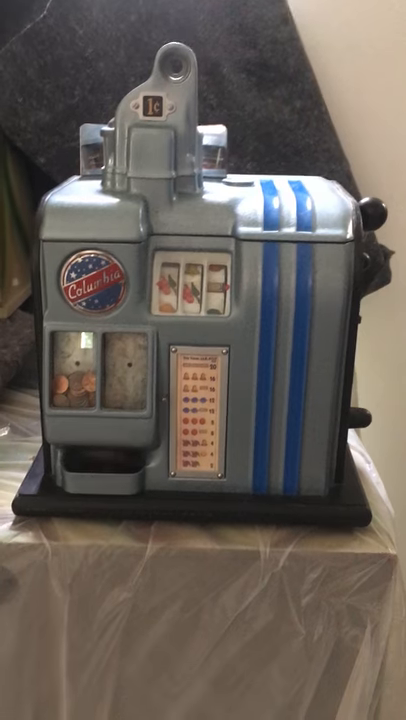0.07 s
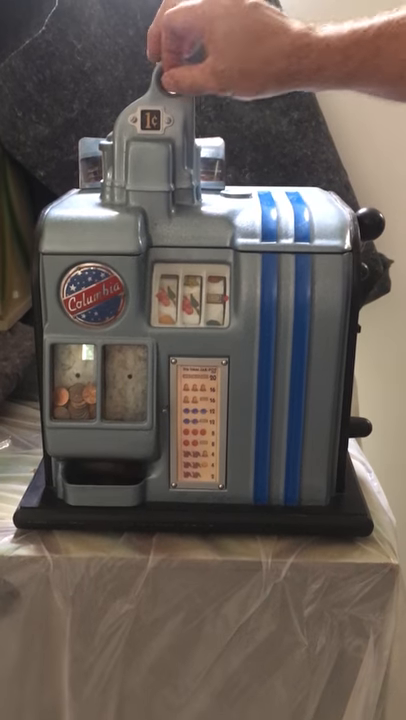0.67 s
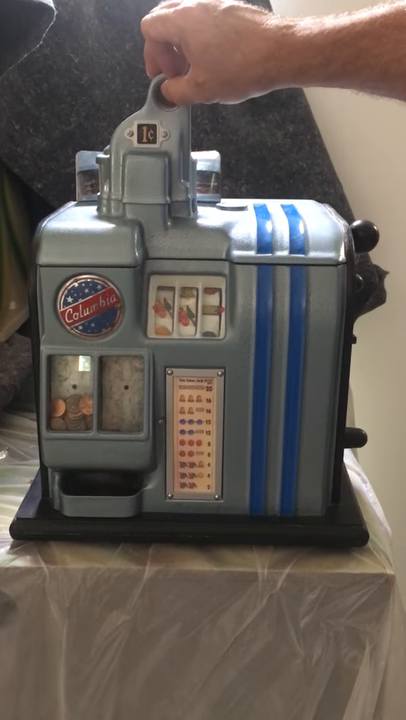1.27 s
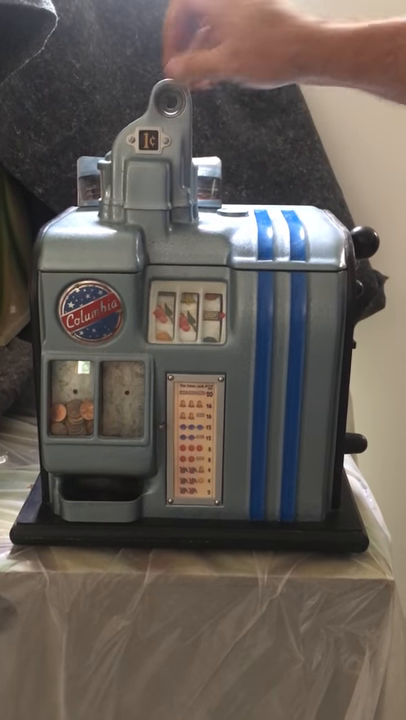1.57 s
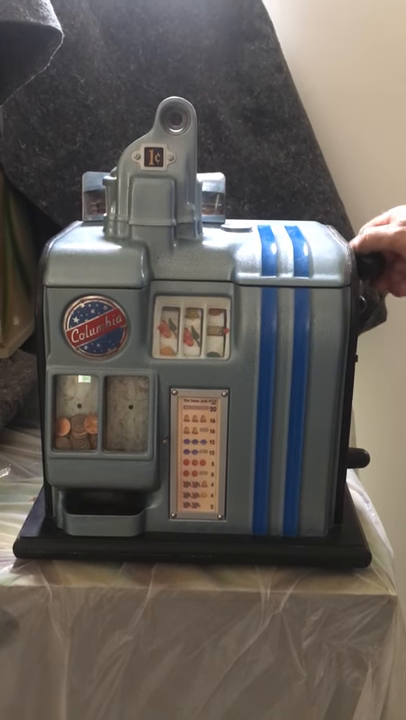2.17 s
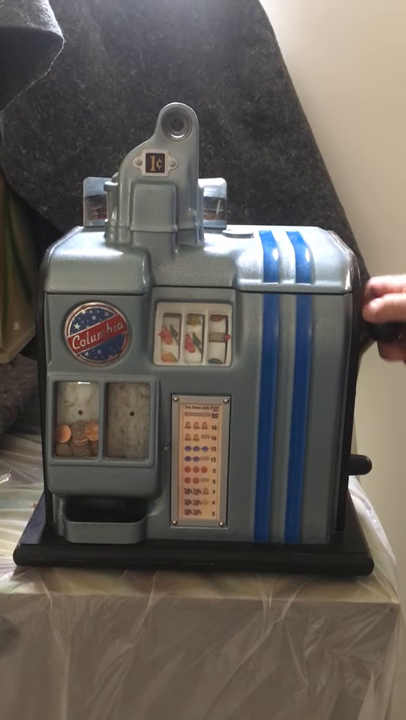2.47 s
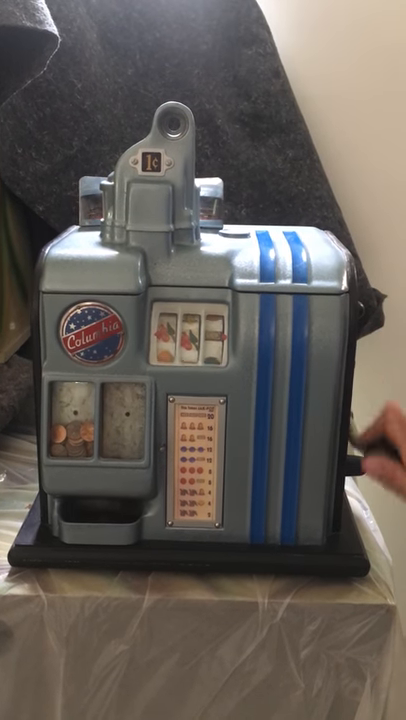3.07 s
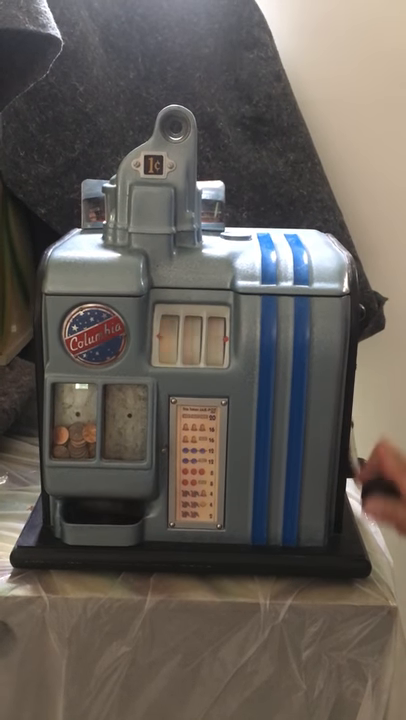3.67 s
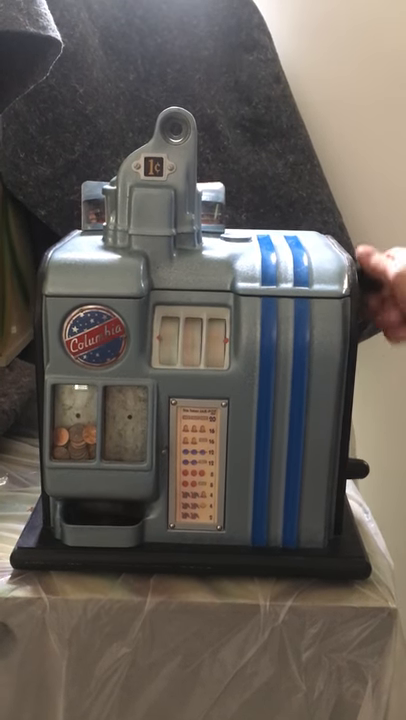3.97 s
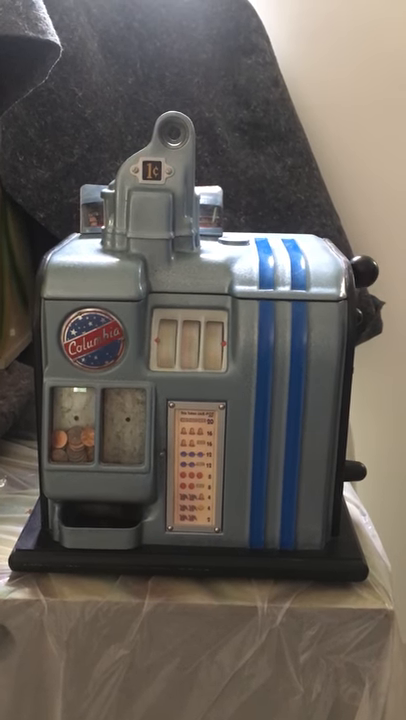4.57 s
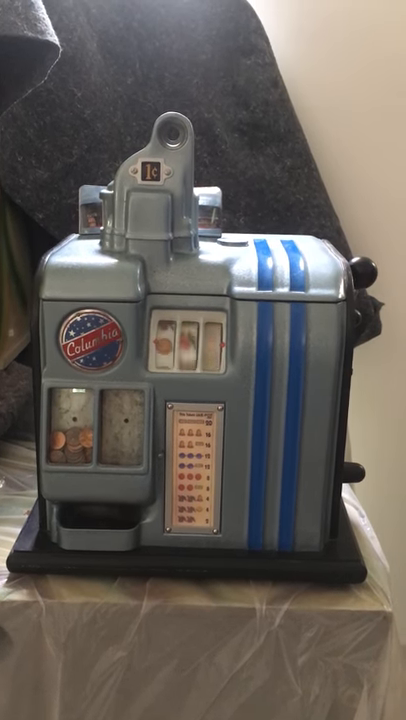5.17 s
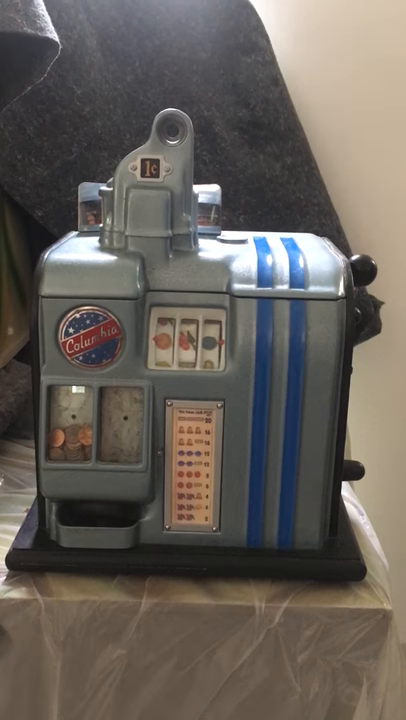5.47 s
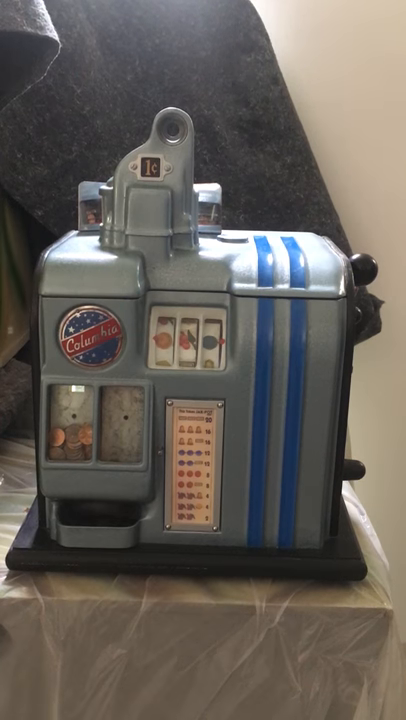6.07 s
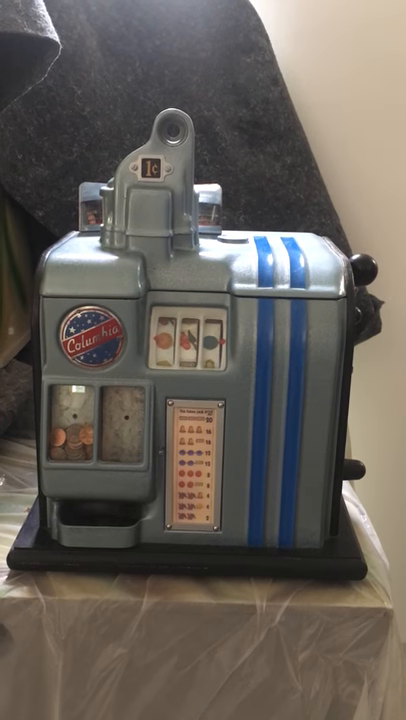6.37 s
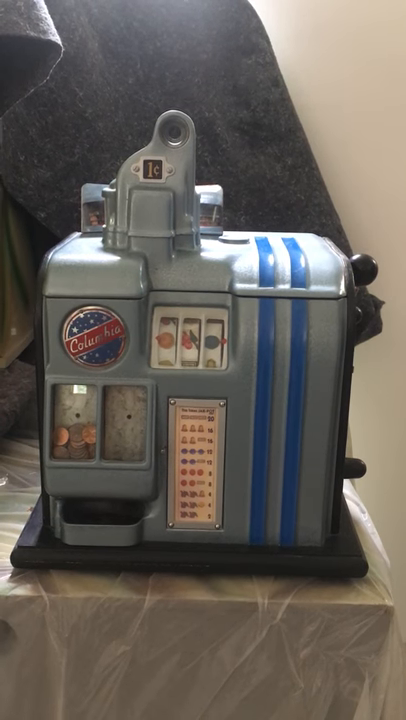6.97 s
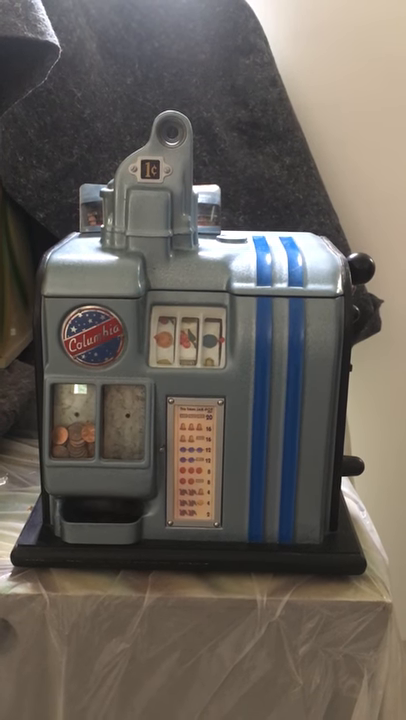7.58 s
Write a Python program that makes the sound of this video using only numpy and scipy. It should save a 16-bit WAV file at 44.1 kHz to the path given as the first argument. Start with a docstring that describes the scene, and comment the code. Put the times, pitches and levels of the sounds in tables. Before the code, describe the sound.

A coin scrapes softly in the slot of a metal slot machine and rattles down its chute. The hand lever is pulled through a rising series of clicks to a loud clunk. The reels whirr while the lever knocks back into place, then stop with a cluster of metallic clicks. The clockwork hums on briefly, halts with a sharp click, and loose parts tick faintly. It is heard from nearby in a quiet room.

```python
"""A cast-metal clockwork slot machine is played on a table in a quiet room. A coin rattles down its
chute, each impact exciting the modes of the casting. The hand lever is pulled over its catches and fires
the reels with a clunk. Gear teeth drive the drums and plates into a whirr, and the fan governor hums at
the resonance of its bracket. Pawls drop into the reels, a latch halts the clockwork with a click, and
the loose parts settle in damped vibration."""
import sys
import numpy as np
from scipy import signal
from scipy.fft import rfft, irfft, next_fast_len
from scipy.io import wavfile
from scipy.ndimage import map_coordinates

SR = 44100
rng = np.random.default_rng(int(sys.argv[2]) if len(sys.argv) > 2 else 0)


def to_wav(s):
    """Save 16-bit WAV."""
    ch = np.atleast_2d(s).T  # columns
    pcm = np.round(np.clip(ch, -1, 1) * 32767)  # PCM
    wavfile.write(sys.argv[1], SR, pcm.astype(np.int16))


N = 344862

# Swells of a faint metallic hiss. Each row: time of the crest in seconds, level in dB, T60 in seconds.
HISS_CRESTS = [(.09, -57.5, 2.13), (1.35, -66.5, 2.2), (2.75, -68, .8)]
# Dull bumps of the machine. Each row: start in seconds, cabinet level in dB, table level in dB.
SOFT_BLOWS = [(0.155, -49.5, -58), (0.388, -54, -70), (0.645, -53, -63), (1.495, -44, -55),
              (1.727, -42, -59), (1.81, -44, -58), (1.977, -49.5, -51), (2.327, -44.5, -49),
              (2.442, -37, -55), (2.609, -47.5, -57), (2.831, -33.5, -32.5), (2.983, -24.5, -24.5),
              (3.135, -24, -30.5), (3.285, -25, -38), (3.309, -18, -16), (3.368, -32, -34),
              (3.855, -33, -55), (4.133, -18.5, -30), (4.316, -32.5, -35), (4.374, -23.5, -40),
              (5.127, -27, -59), (6.465, -47, -37.5)]
# The coin in slot, chute and seat. Each row: start in seconds, then click, brightness and ring in dB.
COIN_HITS = [(0.6277, -42, 10, -44), (0.719, -46.5, -10, -55), (1.279, -34, -27, -36),
             (1.302, -37, 14, -48), (1.337, -34.5, -5, -40.5), (1.352, -35.5, -7, -45),
             (1.374, -42, 15, -54), (1.378, -34, 12, -34.5), (1.4022, -34, 10, -41),
             (1.413, -37, 16, -39.5), (1.4356, -39, -7, -42.5), (1.4585, -31.5, -1, -40.5),
             (1.472, -37.5, -22, -41), (1.4897, -32.5, -9, -43), (1.723, -35.5, 6, -40.5),
             (1.784, -46, -8, -49), (1.804, -30, -0.5, -40.5), (2.302, -45, 6, -55.5), (2.316, -51, 8, -58)]
# Impacts of metal on metal. Each row: start in seconds, relative level in dB, brightness in dB.
LEVER_HITS = [(2.324, -45, -26), (2.4395, -37.5, -32), (2.562, -57, -27), (2.8076, -36.5, -9),
              (2.817, -35, 6.5), (2.9442, -38.5, 1.5), (2.9703, -30, -5), (2.9813, -24.5, -12),
              (2.9963, -26.5, 8), (3.0063, -20, -9), (3.1133, -29, -5.5), (3.1337, -18.5, 2.5),
              (3.1601, -15, -0.5), (3.2823, -22, -6), (3.2882, -10.5, -2), (3.3075, -11.5, -0.5),
              (3.3125, -4.5, 1.5), (3.3203, -10, 0.5), (3.3857, -15.5, 0.5), (3.5377, -28.5, 0),
              (3.815, -29, -4), (3.8417, -28.5, -11), (3.927, -19.5, -11), (4.0205, -28.5, -6)]  # the hand lever passes its catches, fires the clockwork and returns
LATCH_FLICKS = [(4.1325, -42.5, 6), (4.392, -37, -14), (5.207, -32.5, -2), (5.337, -31, 4),
                (5.689, -28.5, 0), (5.931, -38, 0), (6.205, -40, 3)]  # the running clockwork flicks the brake latch
PAWL_HITS = [(4.7402, -19, -3), (4.8267, -24, -8), (5.13, -19, -2.5), (5.3091, -22, -3), (5.354, -21.5, 9),
             (5.3802, -18.5, 2.5), (5.3994, -18, -4), (5.44, -24, 2), (5.4817, -16, 4.5),
             (5.4961, -19.5, 2.5)]  # pawls drop into the spinning reels
BRAKE_HITS = [(6.4054, -21.5, 3), (6.4158, -29, 6)]  # the latch snaps shut and bounces
LOOSE_HITS = [(6.5572, -45, -15), (6.6224, -40.5, -14), (6.7121, -41.5, -15), (6.734, -37.5, -27),
              (6.8498, -41, 4), (6.8944, -47.5, -15), (7.1149, -60, -8), (7.1993, -44.5, 2)]  # loose parts settle
# Levers sliding under load. Each row: start and length in seconds, then rattle, scrape and rocking in dB.
LEVER_SLIDES = [(2.806, 0.15, -53, -66, -51), (3.827, 0.15, -48, -70, -47),
                (4.572, 0.24, -41.5, -56.5, -42.5), (5.123, 0.23, -46, -58, -43.5),
                (5.334, .21, -37, -51, -42)]
# Clockwork speed, gaining as the reels drop out. Each row: time in seconds, governor blade rate in Hz.
BLADE_RATE = [(3.4, 180), (3.65, 232), (3.85, 266), (4.45, 274), (4.85, 292), (4.97, 311), (5.08, 326),
              (5.66, 343), (5.85, 312), (6.02, 308), (6.27, 318), (6.47, 311)]

# Damped modes. Each row: frequency in Hz, relative level in dB, T60 in seconds.
SIDE_MODES = [(199, -13, 0.093), (275, 0.5, 0.072)]  # the side panels under a soft blow
TABLE_MODES = [(55, -12.5, .24), (99.6, -3, 0.16), (127.4, -2.5, 0.16)]
CHUTE_MODES = [(630, -13, .2), (990, -13, .15), (1140, -15, .15), (2568, -7, .13), (2965, -6, .12),
               (3182, -11, .48), (3370, -9, .12), (3900, -2, .08), (4160, -6, .12), (4840, -13, .09),
               (5448, -8, .12), (5645, -13, .13), (6783, -21, .08)]  # the coin head with its slot and chute
PANEL_MODES = [(262.9, 2.5, 0.11), (295, -3.5, 0.15), (426, -13.5, 0.42)]  # the low knock of the cabinet
DISC_MODES = [(12420, 0, .3), (12540, -1, .3)]  # the coin's own split mode

# Resonances. Each row: centre frequency in Hz, bandwidth in Hz, relative level in dB.
PLATE_PEAKS = [(630, 30, -7), (778, 25, -5), (1255, 30, -5), (1590, 50, 3.5), (1803, 28, -2),
               (2133, 20, -1), (2332, 24, -1), (2491, 22, 0), (2580, 22, -2), (2700, 45, -2),
               (2787, 28, -1)]  # gear plates
FRAME_PEAKS = [(540, 50, -7), (690, 110, -5), (1040, 40, -7), (1250, 80, -6), (1560, 140, -4),
               (2048, 55, -3), (2413, 55, -2), (2660, 50, -4), (2917, 36, 0), (3084, 40, -2),
               (3128, 45, -4), (3445, 40, -6), (3690, 45, -6), (4165, 100, -3), (4522, 60, -3)]  # frame and casting
DRUM_PEAKS = [(690, 90, -4), (777, 25, 0), (1160, 70, -4), (1255, 35, -3), (1610, 60, -5), (1803, 35, -4),
              (2140, 25, -4), (2690, 70, -3), (3110, 55, -2)]  # reel drums
LATCH_PEAKS = [(4350, 220, 0), (5150, 220, -2), (5530, 170, -1), (8200, 250, -7), (8870, 220, -4)]  # the thin steel latch
RIM_PEAKS = [(2750, 590, 0)]  # reel rims under a pawl

# Spectral envelopes. Each row: frequency in Hz, relative spectral density in dB.
ROOM_RUMBLE_SPECTRUM = [(20, -18), (58, 1), (93, -12.5), (132, -11.5), (210, -21.5), (2000, -60.5)]
ROOM_TONE_SPECTRUM = [(100, -20), (300, -20), (480, -22), (900, -27.5), (2300, -32), (3400, -32),
                      (4900, -38), (17000, -46)]
HISS_SPECTRUM = [(600, -15), (1400, -15.5), (1750, -4), (2200, -9), (3200, -7.5), (4600, -14), (5400, -29),
                 (9000, -42.5)]
CLICK_SPECTRUM = [(280, -15), (450, -12.5), (1200, -18.5), (2200, -8), (3900, -1), (4700, -15),
                  (8500, -31.5), (12800, -36), (17000, -61)]
CASTING_SPECTRUM = [(200, -5), (450, -2.5), (1300, -7.5), (3000, -3), (4100, -10), (4700, -9), (8500, -27),
                    (17000, -52)]  # dense weak modes struck by the coin
CATCH_SPECTRUM = [(120, -19), (280, -7.5), (400, -10.5), (560, -6.5), (1100, -10), (2200, -11), (3100, -9),
                  (4100, -11), (4900, -18), (8000, -31), (17000, -52)]
WHIRR_SPECTRUM = [(150, -30), (280, -4), (360, -8), (500, -11.5), (650, -5.5), (1050, -7), (2000, -3),
                  (2700, -2.5), (3400, -4.5), (4200, -11.5), (5000, -23.5), (7000, -35), (12000, -54)]
FIZZ_SPECTRUM = [(3000, -19.5), (4500, -3), (5500, 9), (6600, -7), (9200, -11), (10300, -15.5),
                 (17000, -25)]
ROCKING_SPECTRUM = [(25, -20), (80, -1), (140, -4), (210, -9), (275, -1), (380, -21), (700, -58)]  # the table
LATCH_SPECTRUM = [(200, -21), (1100, -6.5), (3000, -7), (4300, -5), (5600, -15.5), (6200, -16.5),
                  (9500, -26.5), (10500, -32), (17000, -40)]

# Reverberation of the room. Each row: frequency in Hz, T60 in seconds.
ROOM_DECAY = [(100, 0.82), (500, 0.46), (3000, 0.26), (7000, 0.084), (15000, 0.1)]

RELEASE_S, HALT_S = 3.33, 6.475  # the clockwork runs between these times
CRUISE_HZ = 311  # blade rate at which the governor meets the resonance of its bracket
TIME, HIT_TIME = np.arange(N) / SR, np.arange(SR // 2) / SR  # seconds into the scene, and into one impact


def amp(db):
    """Amplitude grows tenfold with every 20 dB."""
    return 10 ** (np.asarray(db) / 20)


def unit(x):
    """Division by the rms gives a signal of unit power."""
    return x / np.sqrt(np.mean(x ** 2) + 1e-20)


def along(points, hz):
    """Interpolation of (Hz, value) points on a logarithmic frequency axis."""
    knots_hz, values = np.transpose(points)
    return np.interp(np.log(hz + 1), np.log(knots_hz + 1), values)


def wobble(per_s):
    """Slow random modulation: a spline through per_s Gaussian knots a second."""
    knots = rng.standard_normal(int(N * per_s / SR) + 4)
    return map_coordinates(knots, [np.arange(N) * per_s / SR])


def grit(per_s):
    """A Poisson process of tiny impacts, at unit power."""
    return unit((rng.random(N) < per_s / SR) * rng.standard_normal(N))


def fade(t, t60):
    """Exponential damping: the level falls 60 dB in t60 seconds."""
    return np.exp(-np.log(1000) * t / t60)


def stroke(start, length, rise, t60):
    """Envelope of a movement: a linear rise, then exponential decay once its length has passed."""
    t = TIME - start
    return np.clip(t / rise, 0, 1) * fade(np.maximum(t - length, 0), t60)


def coloured(x, gain):
    """Minimum-phase filtering: folding the cepstrum makes the response gain(hz) causal."""
    size = 2 * next_fast_len(len(x) // 2 + 4096)
    magnitude = np.maximum(gain(np.fft.rfftfreq(size, 1 / SR)), 1e-6)
    cepstrum = irfft(np.log(magnitude))
    cepstrum[1:size // 2] *= 2
    cepstrum[size // 2 + 1:] = 0
    return irfft(rfft(x, size) * np.exp(rfft(cepstrum)), size)[:len(x)]


def resonances(peaks, hz, lift_db):
    """Lorentzian resonances add in power to a flat response; the result is an amplitude gain."""
    power = sum(amp(db + lift_db) ** 2 / (1 + (2 * (hz - centre) / width) ** 2)
                for centre, width, db in peaks)
    return np.sqrt(1 + power)


def response(spectrum, peaks=(), lift_db=0):
    """A body's gain as a function of frequency is its spectral envelope times its resonances."""
    return lambda hz: amp(along(spectrum, hz)) * resonances(peaks, hz, lift_db)


def driven(force, spectrum, peaks=(), lift_db=0):
    """Forced vibration: a force filtered by a body's response, at unit power."""
    return unit(coloured(force, response(spectrum, peaks, lift_db)))


def noise(spectrum):
    """Stationary Gaussian noise with this spectral envelope, at unit power."""
    return driven(rng.standard_normal(N), spectrum)


def noise_band(centre_hz, half_width_hz, order, samples=N):
    """Band-pass noise at unit power; a higher order steepens the skirts."""
    band = lambda hz: 1 / (1 + ((hz - centre_hz) / half_width_hz) ** order)
    return unit(coloured(rng.standard_normal(samples), band))


def hardness(hz, bright_db):
    """Harder contacts excite more treble: a shelf in dB above about 5 kHz."""
    return bright_db / (1 + (5200 / (hz + 1)) ** 6)


def ring(modes, scatter_db):
    """Free vibration is a sum of damped sinusoids, here of random strength and phase."""
    return sum(amp(db + scatter_db * rng.standard_normal()) * fade(HIT_TIME, t60)
               * np.sin(2 * np.pi * (hz * HIT_TIME + rng.random())) for hz, db, t60 in modes)


def add(track, start, sound):
    """Superposition: a sound joins the track at start seconds."""
    part = track[round(start * SR):][:len(sound)]
    part += sound[:len(part)]


def background():
    """Steady room tone and a sinking rumble lie under a brief bright hiss and faint metallic swells."""
    hiss = unit(coloured(noise(HISS_SPECTRUM), response([(0, 0)], PLATE_PEAKS, lift_db=-2.5)))
    swells = sum(amp(db) * fade(np.abs(TIME - crest), t60) for crest, db, t60 in HISS_CRESTS)
    bright = noise([(500, -13), (3300, 2.5), (8000, -6.5), (17000, -15)])
    opening = amp(-49) * stroke(.083, length=0, rise=.001, t60=.15) * bright
    rumble = amp(-62.5 - .5 * TIME) * noise(ROOM_RUMBLE_SPECTRUM)
    return rumble + amp(-68.5) * noise(ROOM_TONE_SPECTRUM) + swells * hiss + opening


def bumps():
    """Soft, heavy blows excite only low modes, first of the cabinet and then of the yielding table."""
    out, t = np.zeros(N), HIT_TIME
    table_lag_s = .012
    for start, cabinet_db, table_db in SOFT_BLOWS:
        for lag, db, modes in ((0, cabinet_db, SIDE_MODES), (table_lag_s, table_db, TABLE_MODES)):
            for hz, mode_db, t60 in modes:
                swell = (1 - np.exp(-t / .007)) ** 2 * fade(t, t60)
                shudder = noise_band(hz, half_width_hz=hz / 2, order=4, samples=len(t))
                vibration = np.sin(2 * np.pi * hz * t) + shudder / 3
                add(out, start + lag, amp(db + mode_db - 3) * swell / swell.max() * vibration)
    return out


def coin_burst(spectrum, bright_db, t60):
    """Modes too dense to resolve answer a coin's impact as a burst of decaying noise."""
    gain = lambda hz: amp(along(spectrum, hz) + hardness(hz, bright_db))
    return unit(coloured(rng.standard_normal(len(HIT_TIME)), gain)) * fade(HIT_TIME, t60)


def coin():
    """Impact excitation: each contact clicks and rings the coin head; the coin rings only while free."""
    out = np.zeros(N)
    free_from_s, free_until_s = 1.29, 1.79
    for start, click_db, bright_db, ring_db in COIN_HITS:
        head_modes = [(hz, db + hardness(hz, bright_db) / 2, t60) for hz, db, t60 in CHUTE_MODES]
        head = ring(head_modes, scatter_db=4)
        disc = (free_from_s < start < free_until_s) * ring(DISC_MODES, scatter_db=4.5)
        knock = ring(PANEL_MODES, scatter_db=5.5) * (1 - np.exp(-HIT_TIME / .0053))
        casting = coin_burst(CASTING_SPECTRUM, bright_db, t60=.15)
        click = coin_burst(CLICK_SPECTRUM, bright_db, t60=.015)
        body = amp(-8) * (head + amp(-25) * disc) + amp(-11.5) * casting + amp(-13) * knock
        add(out, start, amp(click_db) * click + amp(ring_db) * body)
    return out


def coin_slide():
    """Stick-slip friction of the coin's rim along the slot drives the modes of the coin head."""
    slips = rng.standard_normal(N) * amp(2.5 * wobble(210))
    head_peaks = [(hz, 6 / t60, db) for hz, db, t60 in CHUTE_MODES]  # damping widens a resonance
    rim_spectrum = [(400, -9), (2400, -6), (4200, -6), (5700, -9), (7000, -22), (17000, -45)]
    scrape = driven(slips, rim_spectrum, head_peaks, lift_db=15)
    return amp(-52) * stroke(.778, length=.048, rise=.026, t60=.24) * scrape


def contacts(hits, gain, peaks, t60, attack, ring_db, tail_db, tail_t60, knock_db):
    """Metal impacts excite a clash of dense short modes, a few lasting ones and a slower cabinet knock."""
    out, t = np.zeros(N), HIT_TIME
    rise = 1 - np.exp(-t / attack)  # the blow spreads through the frame
    decay = fade(t, t60) + amp(tail_db) * fade(t, tail_t60)
    modes = [(hz, db, 7 / width) for hz, width, db in peaks]  # narrow resonances ring longest
    for start, db, bright_db in hits:
        burst = rng.standard_normal(len(t)) * rise * decay
        clash = coloured(burst, lambda hz: gain(hz) * amp(hardness(hz, bright_db)))
        clash /= np.sqrt(np.mean(clash[:SR // 125] ** 2))  # unit power over the first 8 ms
        knock = ring(PANEL_MODES, scatter_db=2) * (1 - np.exp(-t / .0054))
        ringing = rise * ring(modes, scatter_db=.5)
        add(out, start, amp(db) * (amp(-10) * clash + amp(ring_db) * ringing + amp(knock_db) * knock))
    return out


def catches():
    """The sprung hand lever, the pawls and loose parts strike the frame into free vibration."""
    frame = response(CATCH_SPECTRUM, FRAME_PEAKS, lift_db=9)
    rims = lambda hz: frame(hz) * resonances(RIM_PEAKS, hz, lift_db=3.5)
    casting = dict(peaks=FRAME_PEAKS, t60=.065, ring_db=-29, tail_db=-16, tail_t60=.36)
    lever = contacts(LEVER_HITS, frame, attack=.0013, knock_db=-13, **casting)
    pawls = contacts(PAWL_HITS, rims, attack=.0018, knock_db=-25.5, **casting)
    loose_parts = contacts(LOOSE_HITS, frame, attack=.0019, knock_db=-17, **casting)
    return lever + pawls + loose_parts


def rattle(force, peaks):
    """An irregular force drives the resonances of the drums or gear plates, at unit power."""
    return driven(force, WHIRR_SPECTRUM, peaks, lift_db=9)


def drone(hz, jitter, flutter_db, octave_db):
    """A low tone and its weak second harmonic, randomly modulated in frequency and amplitude."""
    phase = 2 * np.pi * np.cumsum(hz * (1 + jitter * wobble(40))) / SR
    tone = np.sin(phase) + amp(octave_db) * np.sin(2 * phase)
    return np.sqrt(2) * tone * amp(flutter_db * wobble(35))


def sliding_levers():
    """Sliding friction under load rattles the drums, scrapes the steel and rocks the table."""
    jolts = (.6 * grit(per_s=2500) + rng.standard_normal(N)) * amp(1.5 * wobble(60))
    slips = (.5 * grit(per_s=580) + rng.standard_normal(N)) * amp(3.5 * wobble(70))
    clatter = rattle(jolts, DRUM_PEAKS)
    scrape = driven(slips, FIZZ_SPECTRUM)
    rocking = noise(ROCKING_SPECTRUM)
    out = np.zeros(N)
    for start, length, rattle_db, scrape_db, rock_db in LEVER_SLIDES:
        friction = amp(rattle_db) * clatter + amp(scrape_db) * scrape + amp(rock_db) * rocking
        out += stroke(start, length, rise=.045, t60=.49) * friction
    # The first stop lever judders and squeaks as it takes the load.
    groan = drone(hz=270, jitter=.03, flutter_db=3.5, octave_db=-19)
    squeak = noise_band(centre_hz=8800, half_width_hz=750, order=4)
    out += amp(-66) * stroke(4.565, length=.19, rise=.04, t60=.19) * squeak
    out += amp(-34.5) * stroke(4.595, length=.06, rise=.016, t60=.61) * groan
    return out


def gears(blade_hz):
    """Uneven tooth impacts force drums and plates to whirr, louder with speed; the spin rocks the table."""
    speed = blade_hz / CRUISE_HZ
    teeth_passed = np.cumsum(blade_hz * (1 + .005 * wobble(40))) / SR
    teeth = unit(np.diff(np.floor(teeth_passed), prepend=0) * amp(2.2 * rng.standard_normal(N)))
    force = lambda: (.35 * teeth + .55 * grit(per_s=800) + .63 * rng.standard_normal(N)) * amp(wobble(50))
    spinning = np.interp(TIME, [5.35, 5.89], [1, 0])  # the drums give way to the bare clockwork
    drums = np.sqrt(spinning) * rattle(force(), DRUM_PEAKS)
    plates = np.sqrt(1 - spinning) * rattle(force(), PLATE_PEAKS)
    whirr = amp(-38) * speed ** 3.24 * (drums + plates)
    ticks = (.5 * grit(per_s=150) + rng.standard_normal(N)) * amp(1.5 * wobble(30))
    fizz = amp(-66) * speed ** 3.2 * driven(ticks, FIZZ_SPECTRUM)  # the bright edge of steel on steel
    rocking = amp(-58.5 + 3.5 * spinning) * noise(ROCKING_SPECTRUM)
    return whirr + fizz + rocking


def governor(blade_hz):
    """Resonance: the braking fan hums whenever its blade rate nears the natural frequency of its bracket."""
    bandwidth_hz = 10
    nearness = 1 / np.sqrt(1 + (2 * (blade_hz - CRUISE_HZ) / bandwidth_hz) ** 4)
    return amp(-42.5) * nearness * drone(blade_hz, jitter=.005, flutter_db=1, octave_db=-22)


def latch():
    """A light, thin latch has high modes: it ticks on the running clockwork, then snaps shut brightly."""
    steel = response(LATCH_SPECTRUM, LATCH_PEAKS, lift_db=8)
    return contacts(LATCH_FLICKS + BRAKE_HITS, steel, LATCH_PEAKS, t60=.028, attack=.00037,
                    ring_db=-28, tail_db=-12, tail_t60=.24, knock_db=-27)


def pivot():
    """Friction at the pivot of the returning hand lever excites one narrow resonance."""
    rub = noise_band(centre_hz=780, half_width_hz=22, order=2)
    return amp(-51) * stroke(4.27, length=.19, rise=.039, t60=.16) * rub


def table_thud():
    """The hand lever comes home and the whole table heaves as one damped oscillator."""
    start, hz = 4.385, 50
    heave = np.sin(2 * np.pi * hz * (TIME - start))
    return amp(-35) * stroke(start, length=.022, rise=.02, t60=.2) * heave


def settling():
    """After the halt, loose parts tick and the cabinet drones in damped vibration, down to a faint sway."""
    dying = amp(-52.5) * stroke(HALT_S, length=0, rise=.017, t60=1.04)
    lasting = amp(-69) * (TIME > HALT_S)
    sway_hz, tick_db = 11, 11
    sway_phase = np.cumsum(sway_hz * amp(.96 * wobble(8))) / SR % 1
    ticking = unit(amp(tick_db * np.exp(-3.5 * sway_phase)))  # each sway begins with a tick
    hum = amp(.5) * drone(hz=294, jitter=.0284, flutter_db=7, octave_db=-26.5)
    plates = rattle(rng.standard_normal(N), PLATE_PEAKS)
    return (dying + lasting) * ticking * plates + (dying + amp(-9.5) * lasting) * hum


def room(x):
    """Reverberation is convolution with a diffuse tail in which each frequency decays at its own rate."""
    hz, t, bands = signal.stft(rng.standard_normal((2, SR // 2))[0], SR, nperseg=256)
    decay = amp(-60 * t / along(ROOM_DECAY, hz)[:, None])
    _, tail = signal.istft(bands * decay, SR, nperseg=256)
    tail = coloured(tail / np.linalg.norm(tail), response([(250, -4.5), (700, -2)]))
    delayed = np.pad(x, (SR // 200, 0))  # reflections arrive 5 ms late
    return signal.fftconvolve(delayed, tail)[:N]


def scene():
    """Direct sound, reverberation and background superpose; the clockwork runs from release to halt."""
    running = stroke(RELEASE_S, HALT_S - RELEASE_S, rise=.08, t60=.097)
    blade_hz = np.interp(TIME, *np.transpose(BLADE_RATE))
    blows = coin() + coin_slide() + catches() + latch() + bumps() + table_thud()
    motion = pivot() + sliding_levers() + running * gears(blade_hz) + settling()
    reverberation = amp(-10) * (room(blows) + room(motion))
    return (blows + motion + reverberation + running * governor(blade_hz) + background())[None]


def record(dry):
    """Band limiting: after a moment of silence the sound enters without its deepest bass or top treble."""
    bottom_hz, top_hz = 32, 17200
    fade_in = np.clip((TIME - .081) / .004, 0, 1)
    high_pass = signal.butter(2, bottom_hz, "high", fs=SR, output="sos")
    heard = signal.sosfilt(high_pass, dry * fade_in)
    return irfft(rfft(heard) * (np.fft.rfftfreq(N, 1 / SR) < top_hz), N)


dry = scene()
out = record(dry)
to_wav(out)
```